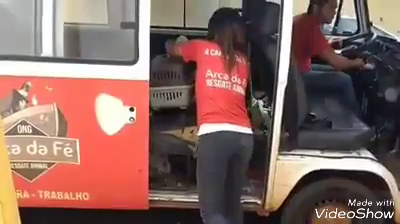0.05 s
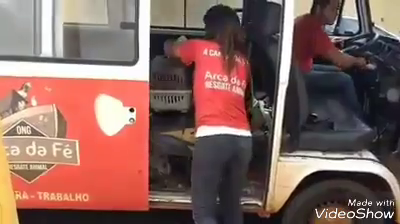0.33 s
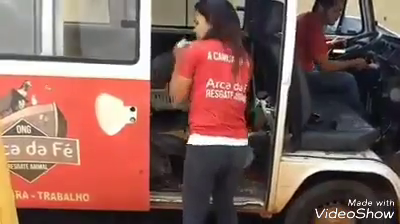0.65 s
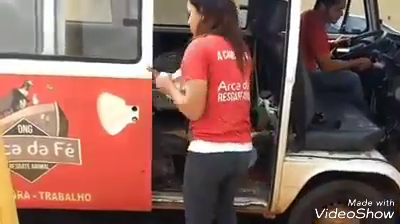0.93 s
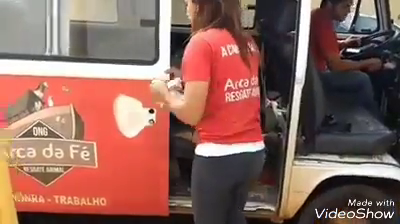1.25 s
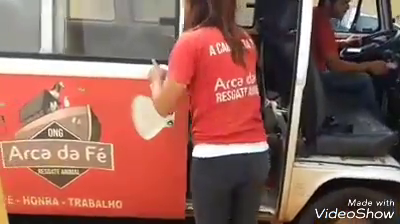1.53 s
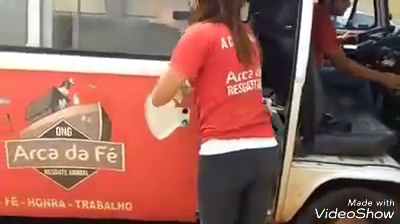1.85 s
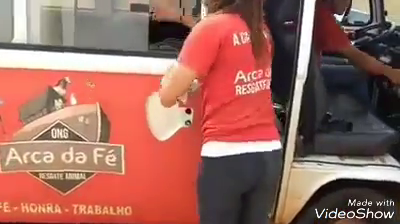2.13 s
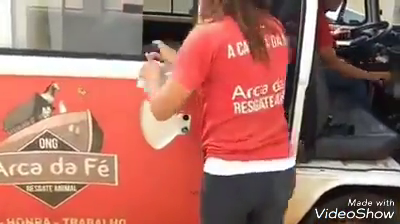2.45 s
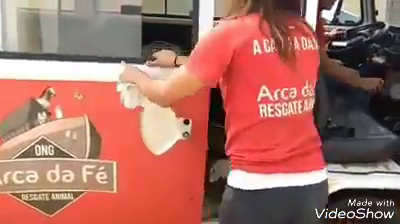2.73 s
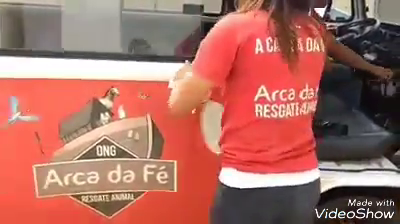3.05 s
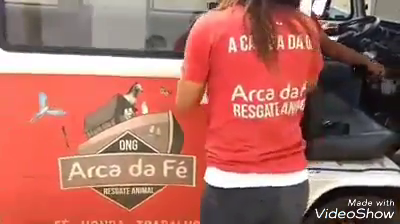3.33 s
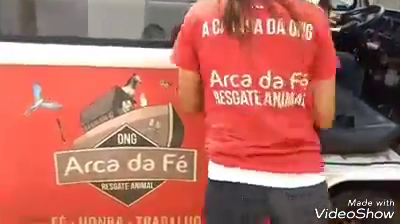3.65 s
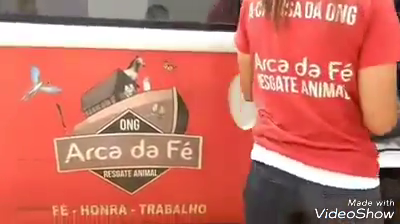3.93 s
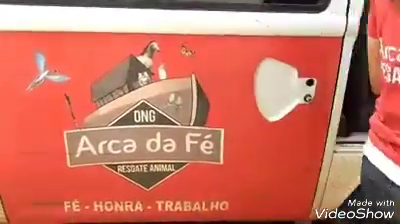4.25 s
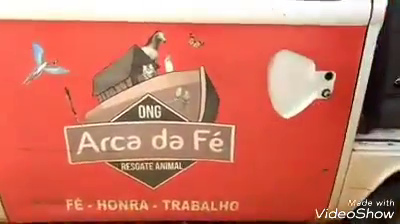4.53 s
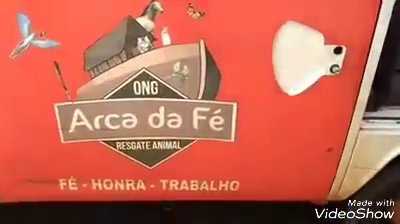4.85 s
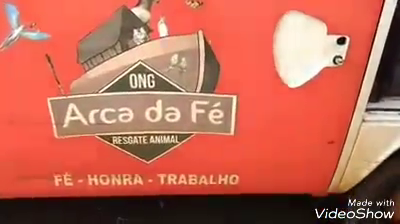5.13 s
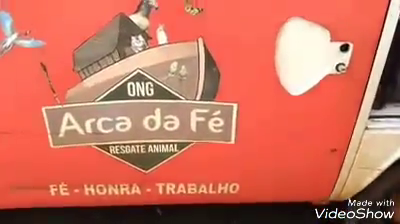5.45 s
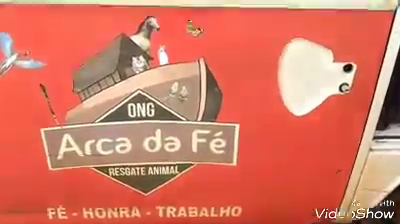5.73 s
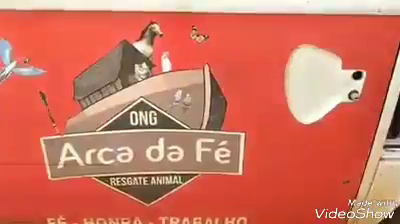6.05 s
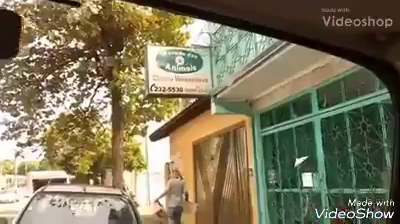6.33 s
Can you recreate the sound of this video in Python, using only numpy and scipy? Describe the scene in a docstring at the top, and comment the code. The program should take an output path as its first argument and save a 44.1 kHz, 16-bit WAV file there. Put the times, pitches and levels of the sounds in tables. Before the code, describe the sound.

A pet carrier bumps and slides on the floor of an old minibus. The starter clacks and grinds briefly, and the engine catches, revs with a few knocks, then settles to a throbbing idle. The sliding door rumbles along its track and slams with a boom and a short metallic ring. The engine goes on more quietly, then grows louder again. It is heard from close by, over faint street traffic.

```python
"""An old minibus engine catches, flares and settles to a throbbing idle: each firing sends a pressure
pulse through the resonances of exhaust pipe and cabin, and shakes block and valves. Before it catches,
a pet carrier bumps on the floor and the starter's gears grind against compression. The sliding door
rumbles along its track and slams, ringing its steel. The clatter drops in level, then steadily grows
louder again and, after a short hiss, the exhaust throbs harder as the engine takes up load."""
import sys
import numpy as np
from scipy import signal
from scipy.fft import rfft, irfft, next_fast_len
from scipy.io import wavfile
from scipy.ndimage import map_coordinates

SR = 44100
rng = np.random.default_rng(int(sys.argv[2]) if len(sys.argv) > 2 else 0)


def generate_wav(sig):
    """Save sig (samples, or channels by samples) to the path in sys.argv[1] as 16-bit PCM at SR."""
    pcm = np.round(np.clip(np.atleast_2d(sig).T, -1, 1) * 32767).astype(np.int16)
    wavfile.write(sys.argv[1], SR, pcm)


N = 282195
DROP_S = 3.6  # the background wash and the engine turn quieter just after the slam


def amp(db):
    """Amplitude ratio of a level in decibels."""
    return np.exp(np.asarray(db) * (np.log(10) / 20))

def unit(x):
    """Normalisation to rms 1."""
    return x / np.sqrt(np.mean(x ** 2) + 1e-20)

def along(points, hz):
    """Interpolation of (f/Hz, value) points on a logarithmic frequency axis."""
    f, v = np.transpose(points)
    return np.interp(np.log(hz + 1), np.log(f + 1), v)

def clock():
    """Time of each sample."""
    return np.arange(N) / SR

def step(on, lag):
    """Smooth transition from 0 to 1 around the time on."""
    return (1 + np.tanh((clock() - on) / lag)) / 2

def wobble(rate):
    """Smooth random modulation, rate knots a second."""
    return map_coordinates(rng.standard_normal(int(N * rate / SR) + 4), [np.arange(N) * rate / SR])

def swells(rows):
    """Gaussian envelopes (t/s, level/dB, half length/s) that add in power."""
    return np.sqrt(sum(amp(db) ** 2 * np.exp(-((clock() - s) / width) ** 2) for s, db, width in rows))

def grit(rate, share, size=N):
    """Shot noise: random impacts, rate a second, carry a share of the power of a noise of rms 1."""
    impacts = (rng.random(size) < rate / SR) * rng.standard_normal(size)
    return np.sqrt(share) * unit(impacts) + np.sqrt(1 - share) * rng.standard_normal(size)

def filtered(x, response):
    """Zero-phase filtering by a function of frequency."""
    size = next_fast_len(N + SR // 2)
    return irfft(rfft(x, size) * response(np.fft.rfftfreq(size, 1 / SR)), size)[:N]

def coloured(x, spectrum, size=8192):
    """Minimum-phase filtering to the shape (f/Hz, level/dB), at unit power gain."""
    gain = np.maximum(amp(along(spectrum, np.fft.rfftfreq(size, 1 / SR))), 1e-5)
    cepstrum = irfft(np.log(gain))
    cepstrum[1:size // 2] *= 2
    cepstrum[size // 2 + 1:] = 0
    kernel = irfft(np.exp(rfft(cepstrum)))
    return signal.oaconvolve(x, kernel / np.linalg.norm(kernel))[:N]

def ringing(x, modes, share):
    """Modal resonance: x drives damped modes (f/Hz, bandwidth/Hz, level/dB), mixed at constant power."""
    t = np.arange(SR // 5) / SR
    ring = sum(amp(db) * width * np.exp(-np.pi * width * t) * np.cos(2 * np.pi * hz * t)
               for hz, width, db in modes)
    response = unit(signal.oaconvolve(x, ring)[:len(x)])
    return unit((1 - share) * unit(x) + share * response) * np.std(x)


# reverberation of cabin and street: f/Hz, T60/s
REVERB_TIMES = [(150, 0.73), (900, 0.34), (3000, 0.43), (10000, 0.22)]

def reverberation(x):
    """A diffuse field decays exponentially, each frequency at its own rate."""
    hz, t, spectra = signal.stft(rng.standard_normal(SR // 2), SR, nperseg=256)
    decay = amp(-60 * t / along(REVERB_TIMES, hz)[:, None])
    tail = signal.istft(spectra * decay, SR, nperseg=256)[1]
    return signal.fftconvolve(x, np.pad(tail / np.linalg.norm(tail), (400, 0)))[:N]

# traffic spectrum: f/Hz, level/dB
TRAFFIC_SPECTRUM = [(25, -36), (50, -10), (120, -2), (200, -9), (340, -4.5), (600, -6), (1100, -8),
                    (1800, -24.5), (2700, -19), (4300, -18), (5600, -36), (6500, -31), (10000, -36.5),
                    (15400, -41.5)]

def street(level_db=-51, drop_db=14):
    """Incoherent summation: distant traffic is a wavering wash, quieter just after the slam."""
    noise = coloured(rng.standard_normal(N), TRAFFIC_SPECTRUM)
    return noise * amp(level_db - drop_db * step(DROP_S, 0.04) + 1.1 * wobble(18))

# brief hisses: t/s, level/dB, half length/s
HISSES = [(2.28, -39.5, 0.064), (2.37, -41.5, 0.024), (2.58, -45.5, 0.011), (3.346, -41.5, .012),
          (5.1, -39.5, 0.04)]
# their spectrum: f/Hz, level/dB
HISS_SPECTRUM = [(400, -21), (1100, 3.5), (1700, -8), (3000, 4), (4300, 3), (5500, -6.5), (6500, -3.5),
                 (8000, -12.5), (10500, -15), (15000, -22.5)]

def swishes():
    """Amplitude-modulated noise is heard as soft hisses and one thin rustle."""
    rustle = grit(2500, 0.22) * swells([(0.765, -52, 0.018)])
    rustle = coloured(rustle, [(2500, -22), (4300, 4), (8000, -6), (15000, -12)])
    return coloured(grit(2800, 0.11) * swells(HISSES), HISS_SPECTRUM) + rustle

# pushes of the carrier: t/s, level/dB, half length/s
DRAGS = [(.02, -47.5, 0.12), (.33, -52.5, 0.4), (.66, -52.5, .13)]
# spectrum of plastic on the floor: f/Hz, level/dB
DRAG_SPECTRUM = [(150, 0), (380, 4.5), (700, -5), (1250, -6), (1900, -12.5), (2750, -1), (3600, -16),
                 (6000, -22), (15000, -40)]

def carrier_drags():
    """Sliding friction makes soft noise as the carrier is pushed into place."""
    return coloured(grit(830, 0.25) * swells(DRAGS), DRAG_SPECTRUM)

# bumps of carrier and bodywork: t/s, level/dB, f/Hz
BUMPS = [(0.095, -26, 145), (.161, -27, 176), (.216, -26.5, 140), (0.338, -31.5, 175), (0.389, -31.5, 133),
         (.542, -28, 138), (0.574, -33, 175), (.635, -30, 161), (.72, -34.5, 132), (0.815, -34, 141),
         (0.92, -27, 130), (2.152, -27, 200), (2.168, -23, 282), (2.244, -19, 210), (2.269, -20, 856),
         (3.49, -24.5, 131), (3.749, -34, 137), (5.019, -37, 110)]

def bumps(t60=0.077):
    """Damped free vibration: each soft bump rings three inharmonic modes of the floor."""
    sound = np.zeros(N)
    age = np.arange(SR // 4) / SR
    attack = 1 - np.exp(-age / 0.0042)
    for s, db, hz in BUMPS:
        phase = 2 * np.pi * hz * age
        ring = np.sin(phase) - 0.14 * np.sin(0.64 * phase) + 0.53 * np.sin(1.6 * phase)
        sound[round(s * SR):][:len(age)] += amp(db - 60 * age / t60) * attack * ring
    return sound

# spectrum of a struck panel: f/Hz, level/dB
THUD_SPECTRUM = [(50, -48), (90, -15.5), (140, -17.5), (210, -6), (330, 3.5), (450, -2.5), (650, -3.5),
                 (860, -0.5), (1300, -8.5), (1900, -23.5), (3000, -53)]

def impacts(rows, clack_spectrum, panel_modes, metal_modes, panel_share, metal_share, scrape_db, settle_s):
    """Impact excitation: dying bursts of contacts make panels thud and loose metal clack."""
    def struck(modes):  # no two blows stir the modes alike
        return [(hz, width, db + 3 * rng.standard_normal()) for hz, width, db in modes]

    sound = np.zeros(N + SR)
    age = np.arange(-SR // 10, SR // 2) / SR
    for s, thud_db, clack_db, t60 in rows:
        rise_s = 0.0007 * amp(-22.5 - max(thud_db, clack_db))  # softer blows rise more slowly
        blow = (1 + np.tanh(age / rise_s / 2)) / 2 * amp(-60 * np.maximum(age, 0) / t60)
        # the parts scrape together just before they meet
        scrape = amp(scrape_db) * np.exp(np.minimum(age / 0.031, -age / settle_s))
        envelope = blow / blow.max() + scrape
        thud = coloured(envelope * grit(1400, 0.4, len(age)), THUD_SPECTRUM)
        thud = ringing(thud, struck(panel_modes), panel_share)
        clack = coloured(envelope * grit(1800, 0.055, len(age)), clack_spectrum)
        clack = ringing(clack, struck(metal_modes), metal_share)
        sound[round(s * SR) - SR // 10:][:len(thud)] += amp(thud_db) * thud + amp(clack_db) * clack
    return sound[:N]

# knocks of carrier, starter pinion and bodywork: t/s, thud level/dB, clack level/dB, T60/s
CABIN_KNOCKS = [(0.258, -33, -46.5, 0.076), (0.272, -32, -35, 0.032), (0.637, -38, -49, 0.089),
                (0.876, -27, -31.5, 0.15), (.937, -33, -24, 0.061), (0.95, -23.5, -26, 0.14),
                (1.742, -51, -34.5, 0.19), (1.914, -34.5, -38.5, 0.045), (2.173, -32.5, -57, 0.083),
                (2.244, -26, -36, 0.046), (2.271, -27, -35.5, 0.039), (2.7, -35.5, -41, 0.18)]
# spectrum of loose metal: f/Hz, level/dB
CLACK_SPECTRUM = [(880, -16.5), (1500, -5), (1850, -6), (2300, 1.5), (2750, 0.5), (3300, -5), (4200, -6.5),
                  (5500, -11), (6400, -13.5), (8000, -14.5), (11000, -20), (13500, -20), (15400, -34.5)]
# modes of the floor and of loose parts: f/Hz, bandwidth/Hz, level/dB
FLOOR_MODES = [(227, 30, -0.5), (324, 11, 2), (470, 18, -5.5), (600, 25, -6), (857, 27, 1.5), (973, 52, 0),
               (1160, 63, 1.5), (1360, 25, -1)]
LOOSE_MODES = [(1330, 25, 10.5), (1690, 30, -0.5), (2055, 33, -0.5), (2382, 25, 0.5), (2464, 13, 5),
               (2680, 22, 4), (2765, 18, -2), (2950, 20, 2.5), (3150, 33, 2.5), (4080, 27, -4.5),
               (4370, 35, -0.5), (4860, 45, -0.5), (6270, 60, 0)]

def cabin_knocks():
    """Impacts inside the cabin excite the modes of floor and loose parts."""
    return impacts(CABIN_KNOCKS, CLACK_SPECTRUM, FLOOR_MODES, LOOSE_MODES,
                   panel_share=0.33, metal_share=0.52, scrape_db=-16, settle_s=0.038)

# spectrum of the rolling door: f/Hz, level/dB
RUMBLE_SPECTRUM = [(47, -47.5), (90, -39.5), (140, -3), (200, -0.5), (330, -1), (450, -1), (620, -9),
                   (780, -4.5), (1000, -5.5), (1570, -22.5), (2600, -20), (4200, -40.5), (7000, -53),
                   (12000, -62), (15000, -75)]
# modes of the hanging door and of its track: f/Hz, bandwidth/Hz, level/dB
HANGING_MODES = [(188, 18, -7), (323, 14, -10.5), (350, 12, -1), (438, 13, 2.5), (472, 10, 0.5),
                 (503, 9.1, 1), (554, 16, -1.5), (733, 28, -3), (781, 25, 1), (883, 14, -4), (958, 24, 4),
                 (1038, 14, -2), (1192, 32, 0.5)]
TRACK_MODES = [(1343, 25, 3), (1610, 19, -3.5), (1850, 25, -7), (2290, 25, -2), (2450, 25, 2),
               (2700, 32, -4.5), (2860, 27, 1.5), (3135, 30, -3.5), (4120, 23, 1), (4470, 18, 0.5),
               (4890, 40, -8.5)]

def door_roll(push_s=3.05, full_speed_s=3.249, swing_in_s=3.44, t60=0.68):
    """Rolling noise grows with speed, drives door and track, and dies as the door swings in."""
    t = clock()
    gathering_db = 94 * np.minimum(t - full_speed_s, 0)
    dying_db = -5.5 * step(swing_in_s, 0.025) - 60 * np.maximum(t - swing_in_s, 0) / t60
    rolling = step(push_s, 0.012) * amp(-21.5 + gathering_db + dying_db + 0.46 * wobble(45))
    rumble = coloured(grit(800, 0.39) * rolling, RUMBLE_SPECTRUM)
    chatter_spectrum = [(700, -25), (1400, 3.5), (4300, -2), (7000, -17.5), (15000, -36)]
    chatter = coloured(grit(170, 0.55) * rolling, chatter_spectrum)
    return ringing(rumble, HANGING_MODES, 0.42) + amp(-20) * ringing(chatter, TRACK_MODES, 0.93)

# blows on track and latch: t/s, thud level/dB, clack level/dB, T60/s
DOOR_KNOCKS = [(3.052, -45, -49, 0.047), (3.162, -26, -35, 0.13), (3.241, -24, -51, 0.04),
               (3.26, -19.5, -45.5, 0.047), (3.338, -31.5, -43.5, 0.11), (3.362, -16, -48, 0.022),
               (3.427, -29, -27, .08), (3.518, -21, -24, 0.11), (3.536, -19, -27.5, 0.069),
               (3.548, -20.5, -30.5, 0.07), (3.565, -19, -32.5, 0.072)]
# latch spectrum: f/Hz, level/dB
LATCH_SPECTRUM = [(880, -11), (1500, -4.5), (1850, -10), (2300, -2), (2750, 1), (3300, -3.5), (4200, -2),
                  (5500, -12.5), (6400, -13), (8000, -16.5), (11000, -21.5), (13500, -27), (15400, -47)]
# modes of the door's sheet steel and of its fittings: f/Hz, bandwidth/Hz, level/dB
STEEL_MODES = [(195, 17, -6.5), (235, 18, -2), (315, 10, -0.5), (355, 10, -6.5), (427, 12, 2),
               (516, 18, 4.5), (600, 18, 4), (728, 16, -1.5), (842, 20, 0), (919, 17, 0), (1100, 20, -10.5)]
FITTING_MODES = [(1440, 17, 5.5), (1776, 20, -1), (2250, 18, -0.5), (2450, 21, 1), (2550, 16, -0.5),
                 (2850, 23, 0), (3220, 28, 2.5), (3940, 30, -3.5), (4170, 23, 1), (4340, 23, 1),
                 (4690, 29, 1), (4790, 40, 2), (5200, 34, 1), (5860, 60, 0), (6650, 40, 1.5)]

def door_knocks():
    """Impacts excite the door's modes as it jolts on its track and meets the latch."""
    return impacts(DOOR_KNOCKS, LATCH_SPECTRUM, STEEL_MODES, FITTING_MODES,
                   panel_share=0.35, metal_share=0.38, scrape_db=-13.5, settle_s=0.018)

def door_boom(at_s=3.528, t60=0.26):
    """Compression of an enclosed volume: the closing door makes the cabin's air boom."""
    age = np.maximum(clock() - at_s, 0)
    spectrum = [(40, -24), (85, -35), (125, -5), (210, -2.5), (280, -25.5), (500, -36.5)]
    boom = coloured(rng.standard_normal(N), spectrum)
    return boom * amp(-21 - 60 * age / t60) * (1 - np.exp(-age / 0.0172))

# high modes of the door's steel skin: f/Hz, level/dB, T60/s
SKIN_MODES = [(1273, -9, 0.17), (1485, -3.5, 0.17), (1530, -6, .2), (1680, -8, 0.22), (1910, -6, .21),
              (2164, -3.5, .2), (2422, 1, .11), (2500, -4, .27), (2700, -1.5, 0.14), (3100, 2, .15),
              (3070, 2, 0.15), (3914, -3.5, .19), (4100, -6, .18), (4185, -3, .15), (4180, -4, .19),
              (4398, -3, .15)]

def door_skin(at_s=3.553):
    """Free vibration of a plate: the slam leaves thin, slightly unsteady tones."""
    age = np.maximum(clock() - at_s, 0)
    ring = np.zeros(N)
    for hz, db, t60 in SKIN_MODES:
        decay = amp(db + rng.normal(0, 1.5) - 60 * age / t60)
        ring += decay * np.sin(2 * np.pi * (hz * age + rng.random()) + 0.3 * wobble(60))
    return amp(-34.5) * (1 - np.exp(-age / 0.0036)) * ring

# scrapes of a loose part along the bodywork: t/s, level/dB, half length/s
SCRAPES = [(2.312, -41.5, 0.01), (2.34, -38.5, 0.013), (2.378, -36, 0.015)]
# modes of the scraped part: f/Hz, bandwidth/Hz, level/dB
SCRAPED_MODES = [(396, 16, 2), (854, 39, 5), (994, 20, -5), (2414, 37, -2), (2640, 44, -5), (4300, 50, -3)]
# spectrum of grinding, shared with the starter's gears: f/Hz, level/dB
GRIND_SPECTRUM = [(90, -44.5), (200, -5), (360, 1), (450, -5), (750, -4.5), (1150, 0.5), (1750, -6.5),
                  (2400, -4.5), (2900, -3.5), (4300, -13.5), (5500, -18.5), (6400, -14), (9000, -26),
                  (12000, -24), (15400, -41.5)]

def scrapes():
    """Gritty friction drives the resonances of the scraped part."""
    friction = coloured(grit(600, 0.71) * swells(SCRAPES), GRIND_SPECTRUM)
    return ringing(friction, SCRAPED_MODES, 0.63)

# compression strokes while cranking: t/s, level/dB, half length/s
COMPRESSIONS = [(1.04, -41.5, 0.047), (1.175, -35.5, 0.034), (1.295, -33, 0.028), (1.404, -30.5, 0.018),
                (1.48, -45, 0.068)]
# modes of the starter's housing: f/Hz, bandwidth/Hz, level/dB
HOUSING_MODES = [(364, 60, -6), (475, 12, -11.5), (577, 25, 0.5), (840, 10, -1), (950, 20, -10),
                 (1089, 43, -2), (1390, 19, 0), (2130, 21, -5), (2250, 25, -4), (2590, 20, -3),
                 (2740, 14, -5), (2990, 17, -8), (4420, 45, 0.5), (4800, 44, -1)]

def starter(unloaded_mesh_hz=1250):
    """Gear meshing: the teeth grind louder and slower as each piston comes up on compression."""
    cranking = np.interp(clock(), [0.94, 0.97, 1.48, 1.6], [0, 1, 1, 0])
    load = swells(COMPRESSIONS)
    mesh_hz = unloaded_mesh_hz * (1 - 0.19 * load / load.max()) * (1 + 0.043 * wobble(90))
    teeth = np.diff(np.floor(np.cumsum(mesh_hz) / SR), prepend=0)
    grind = grit(350, 0.27) + 0.2 * unit(teeth - teeth.mean())
    envelope = 0.86 * load + amp(-45.5) * cranking
    return ringing(coloured(grind * envelope, GRIND_SPECTRUM), HOUSING_MODES, 0.44)

# spectra of block and valves: f/Hz, level/dB
BLOCK_SPECTRUM = [(120, -17), (200, 1.5), (330, -1), (450, -1), (560, -4.5), (800, -6), (1080, -7),
                  (1300, -10), (1600, -15), (2000, -28), (3000, -55.5)]
VALVE_SPECTRUM = [(1000, -21), (1600, -15.5), (1900, -4), (2400, -0.5), (2900, 1), (3300, -3), (4200, -3.5),
                  (4900, -5.5), (5450, -14.5), (6400, -8.5), (8000, -11.5), (10000, -13.5), (12500, -13),
                  (15400, -24.5)]
# modes of the engine covers, and of valve cover and brackets: f/Hz, bandwidth/Hz, level/dB
COVER_MODES = [(340, 16, -8), (396, 21, 1.5), (564, 16, 0.5), (696, 12, 5), (966, 25, 3.5), (1050, 17, 5),
               (1060, 27, 4.5), (1186, 110, 1.5)]
BRACKET_MODES = [(2170, 24, 1), (2352, 20, 0), (2450, 14, -0.5), (2576, 22, -1.5), (2820, 20, -0.5),
                 (2990, 27, -2), (4065, 21, -1), (4280, 28, 2.5), (4600, 23, -1.5), (4820, 46, 2),
                 (6130, 45, 5)]

def clatter(firings, catching, block_db, valve_db):
    """Structure-borne noise, modulated at the firing rate; the valves rattle coarsely at the catch."""
    def throb(depth_db, lag):
        return unit(amp(depth_db * np.cos(2 * np.pi * (firings - lag))))

    block = grit(1100, 0.31) * throb(0.63, 0.07) * amp(block_db + 0.8 * wobble(22.07))
    shaking = throb(0.7, 0.16) * amp(valve_db + 0.56 * wobble(22.17))
    valves = (1 - catching) * grit(1200, 0.096) * shaking
    rattle = catching * grit(260, 0.38) * shaking
    return (ringing(coloured(block, BLOCK_SPECTRUM), COVER_MODES, 0.28)
            + ringing(coloured(valves, VALVE_SPECTRUM), BRACKET_MODES, 0.32)
            + ringing(coloured(rattle, VALVE_SPECTRUM), BRACKET_MODES, 0.38))

def burble(level_db):
    """Uneven combustion adds low-frequency noise under the pulses."""
    spectrum = [(25, -15), (60, 6.5), (110, 15), (220, -4), (400, -38.5)]
    return coloured(rng.standard_normal(N), spectrum) * amp(level_db)

# spectrum of the gas bursts: f/Hz, level/dB
BARK_SPECTRUM = [(80, -31), (140, -7), (190, 1), (270, -3), (330, -11.5), (500, -30), (900, -53)]

def bark(firings, firing_hz, full_hz=36.1, decay_cycles=0.44):
    """Pulsed flow noise: near full speed each firing lets out a short, ragged burst of gas."""
    bursts = unit(np.exp(-((firings + 0.1) % 1) / decay_cycles))
    level_db = -39 + 3.5 * np.minimum(firing_hz - full_hz, 0)
    return coloured(rng.standard_normal(N) * bursts * amp(level_db), BARK_SPECTRUM)

# spectral envelope of the idling exhaust: f/Hz, level/dB
IDLE_SPECTRUM = [(50, -55.5), (59, -53), (70, -54.5), (85, -58), (105, -54), (133, -52), (158, -47.5),
                 (170, -50.5), (184, -45.5), (205, -58), (238, -63.5), (263, -53.5), (290, -64.5),
                 (400, -70.5)]
# its change with open throttle, cabin resonance when racing, load, and after the slam: f/Hz, gain/dB
THROTTLE_GAIN = [(50, 10.5), (60, 11.5), (70, 15.5), (90, 5), (100, 11.5), (107, 16), (138, -9), (160, 0),
                 (200, 1), (280, 3.5), (400, 4)]
CABIN_GAIN = [(120, 0), (145, 10), (163, 3.5), (180, 8.5), (197, 5), (213, 13), (238, 10.5), (260, 0),
              (280, 12), (320, 1)]
LOAD_GAIN = [(50, 9.5), (80, 13), (105, 20.5), (135, 13.5), (165, 9), (195, 6.5), (260, 11), (400, 12)]
DROP_GAIN = [(50, -10.5), (80, -5.5), (105, -8), (130, -4.2), (160, -4.5), (190, -2.5), (260, -8.5)]
# dabs of the throttle: opening t/s, closing t/s, fraction open
THROTTLE_DABS = [(1.463, 1.566, 0.9), (1.63, 1.925, 1), (1.957, 2.715, 0.92)]
IDLE_HZ, RACING_HZ = 26, 28.7  # firing rates

def exhaust(firings, firing_hz, load_s=5.23, dispersion_hz=560, lead_cycles=0.026):
    """Source and filter: harmonics of the firing rate slide through the resonances of pipe and cabin."""
    throttle = sum(opening * (step(on, 0.022) - step(off, 0.022)) for on, off, opening in THROTTLE_DABS)
    load, dropped = step(load_s, 0.096), step(DROP_S, 0.04)
    racing = (1 + np.tanh((firing_hz - RACING_HZ) / 0.6)) / 2 * step(1.95, 0.088)
    sound = np.zeros(N)
    for order in range(2, 12):
        hz = order * firing_hz
        db = (along(IDLE_SPECTRUM, hz) + throttle * along(THROTTLE_GAIN, hz)
              + racing * along(CABIN_GAIN, hz) + load * along(LOAD_GAIN, hz)
              + dropped * along(DROP_GAIN, hz))
        # higher harmonics are less steady and arrive later
        waver_db = order * 0.32 * (1 - 0.65 * dropped) * wobble(18)
        cycles = order * (firings + lead_cycles) - (hz / dispersion_hz) ** 2
        sound -= amp(db + waver_db) * np.sin(2 * np.pi * cycles)
    return sound * amp(0.25 * (firing_hz - IDLE_HZ) + 0.7 * wobble(26))

# engine speed: t/s, firing rate/Hz
FIRING_RATE = [(1.49, 24), (1.62, 27.8), (1.78, 35), (1.87, 36.5), (2.0, 35.5), (2.1, 35.4), (2.5, 32.6),
               (2.8, 29.8), (3.05, 27.2), (3.3, 25.6), (3.9, 25.32), (4.4, 26.43), (4.8, 25.88),
               (5.2, 25.2), (5.5, 26.41), (6.15, 26.25)]

def engine(catch_s=1.405, first_firing_s=1.48, caught_s=1.747, recovery_s=(4.17, 5.28)):
    """Periodic combustion drives exhaust and clatter, both louder with speed."""
    t = clock()
    times, rates = np.transpose(FIRING_RATE)
    firing_hz = np.interp(t, times, rates)
    firings = np.cumsum(firing_hz) / SR
    firings -= np.interp(times[0], t, firings)
    catching = 1 - step(caught_s, 0.062)
    # the clatter drops in level after the slam, then steadily grows louder again
    drop_db = 12.5 * step(DROP_S, 0.04) * np.interp(t, recovery_s, [1, 0])
    block_db = -45 + 0.63 * (firing_hz - IDLE_HZ) + 9 * catching - drop_db
    valve_db = -50 + 0.1759 * (firing_hz - IDLE_HZ) + 11.5 * catching - drop_db
    machinery = clatter(firings, catching, block_db, valve_db)
    combustion = burble(block_db - 11.5 + 4.1 * catching)
    gas = exhaust(firings, firing_hz) + combustion + bark(firings, firing_hz)
    return step(first_firing_s, 0.019) * gas + step(catch_s, 0.034) * machinery

def scene():
    """Superposition at one point; blows and engine also excite the reverberant field."""
    knocks = amp(-1) * (cabin_knocks() + door_knocks())
    blows = knocks + bumps() + door_roll() + door_boom() + door_skin() + scrapes()
    motor = engine()
    echo = reverberation(amp(-13) * blows + amp(-14.5) * motor)
    return (blows + motor + echo + starter() + carrier_drags() + swishes() + street())[None]

def record(dry, top_hz=15500, fade_s=6.153, return_s=6.405):
    """Notch and low-pass filtering shape the treble; the level drops out briefly at the end."""
    # f/Hz, half width/Hz, gain/dB
    notches = [(3560, 215, -19), (7300, 200, -14), (11050, 430, -13), (14750, 300, -11)]

    def response(hz):
        notch_db = sum(db * np.exp(-((hz - centre) / width) ** 2) for centre, width, db in notches)
        return amp(notch_db) * (hz < top_hz)

    t = clock()
    dropout_db = np.clip(np.maximum(1707 * (fade_s - t), 694 * (t - return_s)), -80, 0)
    return filtered(dry[0] * amp(dropout_db), response)[None]


dry = scene()
out = record(dry)
generate_wav(out)
```